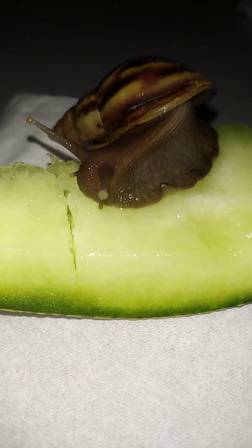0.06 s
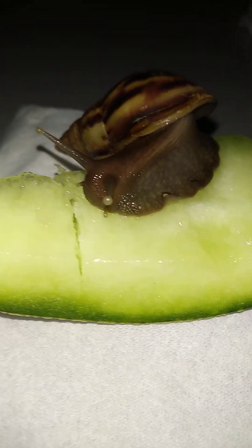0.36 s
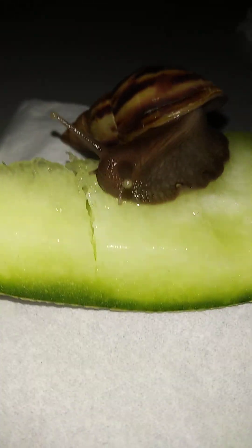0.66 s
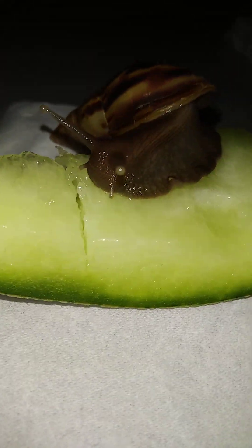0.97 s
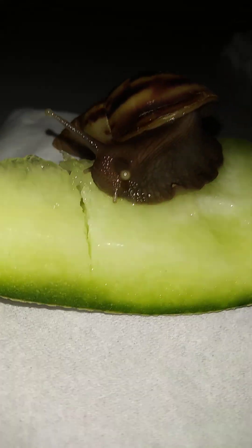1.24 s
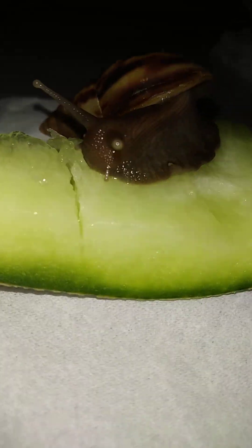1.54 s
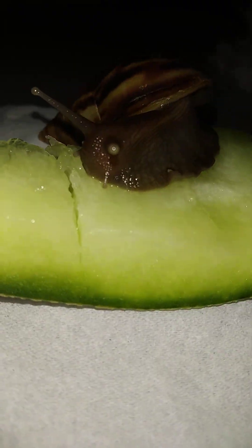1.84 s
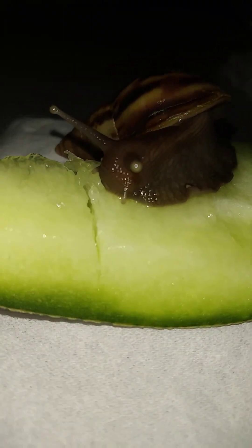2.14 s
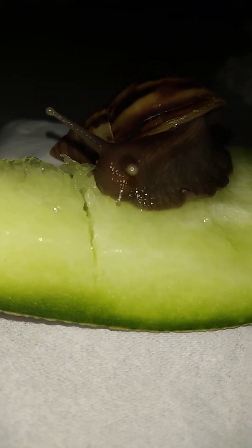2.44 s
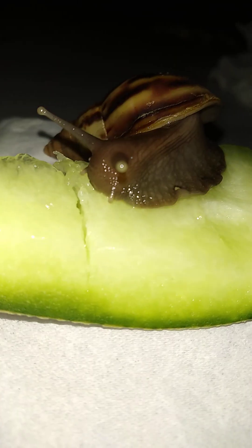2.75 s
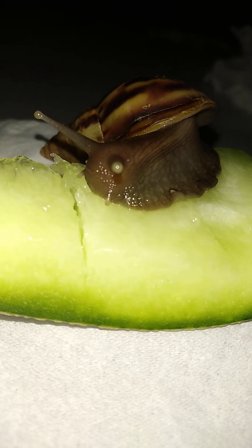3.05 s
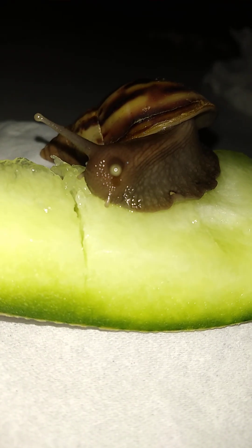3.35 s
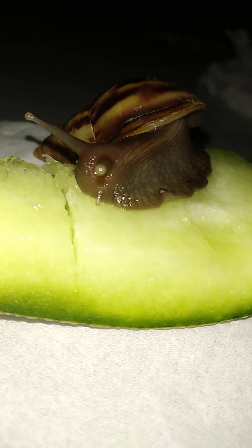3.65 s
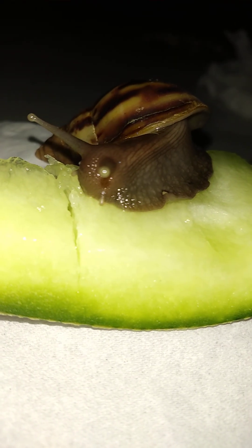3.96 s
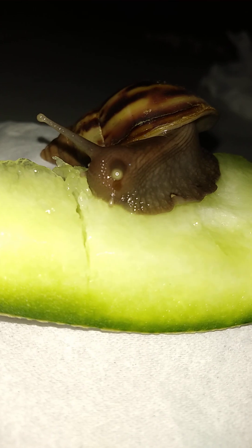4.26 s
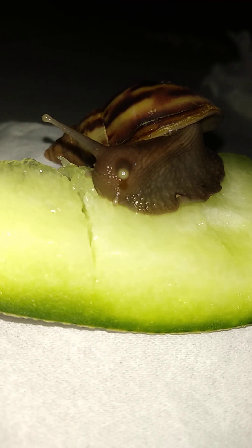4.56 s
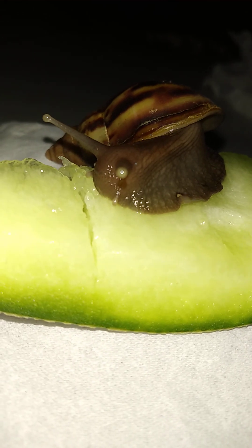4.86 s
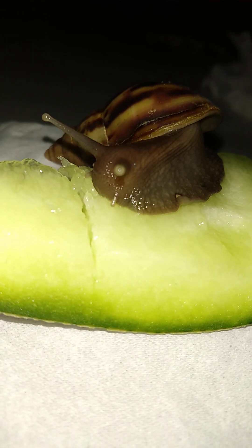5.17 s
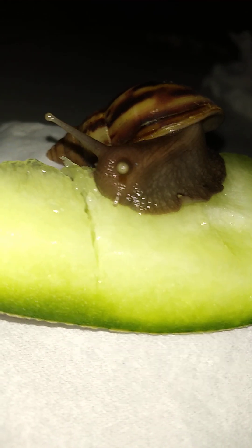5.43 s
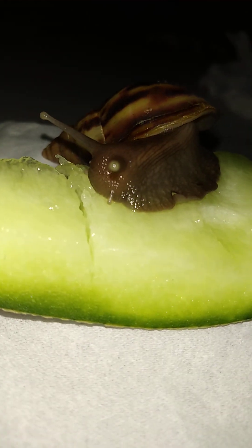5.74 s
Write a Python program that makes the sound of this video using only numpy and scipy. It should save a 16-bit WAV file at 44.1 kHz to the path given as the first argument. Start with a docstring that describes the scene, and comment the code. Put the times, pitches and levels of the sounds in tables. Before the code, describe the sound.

In a quiet room, fingers shift on a hand-held camera close to the left microphone, making soft rubs, creaks and low bumps. About a second in, a fingertip knocks and scrapes across the microphone with one sharp double click. A few light ticks and faint rustles follow. After that, only a steady soft hiss, a low room drone and a faint appliance hum remain.

```python
"""Soft rubs, creaks and bumps, one sharp double click, then only a quiet room with a faint hum.
Fingers shift on a hand-held camera's case beside the left microphone: skin sticks and slips,
the case cracks, and a fingertip knocks and scrapes as it slides off the port (the double click).
Behind them: air and microphone hiss, a low room drone and an appliance's motor tones."""
import sys
import numpy as np
from scipy import signal
from scipy.fft import rfft, irfft
from scipy.io import wavfile

SR = 44100
rng = np.random.default_rng(int(sys.argv[2]) if len(sys.argv) > 2 else 0)


def wav_out(sig):
    """Save sig, one row per channel (or a flat mono array), as 16-bit PCM at SR to the path in sys.argv[1]."""
    wavfile.write(sys.argv[1], SR, np.round(np.clip(np.atleast_2d(sig).T, -1, 1) * 32767).astype(np.int16))


N = 264600
TIME, FREQ = np.arange(N) / SR, np.fft.rfftfreq(N, 1 / SR)
EDGE_HZ = 14300


def knocks():
    """Fingertip on the port: each knock is one pressure pulse that builds and lets go."""
    # t/s, peak before roll-off/dB, build-up/s, release/s, push +1 or pull -1
    pulses = [(0.68, -33, 0.0016, .0017, -1), (0.7176, -26.5, 0.00083, 0.00082, 1),
              (.7385, -30.5, 0.0017, 0.00072, -1), (0.8345, -30, 0.0011, 0.00092, -1),
              (0.9177, -36, 0.0011, 0.0014, -1), (1.02687, -.3, .00058, .00031, -1),
              (1.0342, -10, .0014, .00013, -1), (1.03623, -11, .00024, .00033, 1),
              (1.056, -35, 0.00038, .0005, -1)]
    pressure = np.zeros(N)
    for at_s, db, build_s, release_s, direction in pulses:
        near = slice(round((at_s - .02) * SR), round((at_s + .02) * SR))
        t = TIME[near] - at_s
        width_s = np.where(t < 0, build_s, release_s)
        pressure[near] += direction * gain_of(db) * np.exp(-.5 * (t / width_s) ** 2)
    return port_rolloff(pressure)


def cracks():
    """Each dry crack rings the stiff case for a few milliseconds."""
    # t/s, peak/dB
    hits = [(0.7344, -45), (.8000, -40), (0.8097, -40), (.8190, -47), (0.9976, -37.5), (1.0017, -45),
            (1.0271, -19), (1.0352, -18), (1.086, -39)]
    # case modes: f/Hz, relative level/dB, t60/s
    modes = [(940, 5, 0.0049), (1870, 6, 0.0026), (3000, -0.5, 0.0022), (4110, -8, 0.0048),
             (7400, -24, 0.0018), (13000, -2, .001)]
    t = np.arange(SR // 50) / SR
    ring = sum(gain_of(db - 60 * t / t60_s) * np.sin(2 * np.pi * hz * t) for hz, db, t60_s in modes)
    blows = np.zeros(N)
    for at_s, db in hits:
        blows[round(at_s * SR)] = gain_of(db)
    return signal.oaconvolve(blows, ring / abs(ring).max())[:N]


def scrapes():
    """The fingertip scrapes across the port."""
    # t/s, level/dB, decay/s, tilt/(dB/oct)
    strokes = [(1.0228, -38.5, 0.0072, -2.5), (1.0272, -20.5, 0.0036, -2), (1.034, -22, 0.0036, -1.5),
               (1.051, -47, .009, -0.5), (1.0875, -45, .004, -4)]
    # spectrum: f/Hz, relative level/dB
    colour = [(150, -4.5), (380, 8.5), (720, 3), (1000, 3.5), (1400, -4), (2000, -1), (3300, -2.5),
              (4600, -4), (5200, -10), (7500, -16), (10000, -18), (13500, -14.5)]
    return friction(strokes, colour, grain_db=2, grains_per_s=14000, rise_ratio=.35)


def creaks():
    """Skin sticks and slips on the case."""
    # t/s, level/dB, decay/s, tilt/(dB/oct)
    strokes = [(.677, -51, 0.0045, 0), (.7355, -45, 0.0037, -1), (.7598, -54.5, 0.0055, -1),
               (.8015, -51, 0.0041, -1)]
    # spectrum: f/Hz, relative level/dB
    colour = [(200, -13), (600, 1), (1200, 3.5), (2300, 4.5), (4400, -4), (5300, -11.5), (8000, -17.5),
              (10500, -18), (13500, -13)]
    return friction(strokes, colour, grain_db=2.5, grains_per_s=9100, rise_ratio=.37)


def judder(first_hz=63, last_hz=50, uneven=.132, pulse_s=.0016):
    """Skin catches and lets go in soft, uneven pulses that slow as the finger drags."""
    # grip strength: t/s, level/dB
    grip_curve = [(0.66, -60), (0.67, -58), (0.724, -46), (0.782, -42.5), (0.84, -45), (0.866, -60),
                  (0.916, -44.5), (0.992, -49.5), (1.0, -48)]
    at_s, db = np.transpose(grip_curve)
    grip = gain_of(np.interp(TIME, at_s, db, left=-np.inf, right=-np.inf))
    rate_hz = np.interp(TIME, [at_s[0], at_s[-1]], [first_hz, last_hz])
    cycles = np.cumsum(rate_hz * np.exp(uneven * drift(first_hz))) / SR
    catches = np.diff(np.floor(cycles), prepend=0)
    pulses = irfft(rfft(catches) * np.exp(-2 * (np.pi * FREQ * pulse_s) ** 2), N)
    return grip * unit_rms(port_rolloff(-pulses))


def rubs():
    """Soft rubs and faint rustles."""
    # t/s, level/dB, decay/s, tilt/(dB/oct)
    strokes = [(.315, -58, 0.058, -5.5), (.56, -65, 0.069, 3), (.617, -53.5, 0.037, -2),
               (.79, -64.5, .06, .5), (1.101, -52, 0.016, -3.5), (3.30, -64.5, .04, 0),
               (3.56, -66.5, 0.055, -1), (5.1, -71, .3, .5)]
    # spectrum: f/Hz, relative level/dB
    colour = [(80, -22), (280, 3), (500, -2), (1000, -2.5), (1800, -8), (4600, -15), (5200, -21),
              (7000, -25), (10000, -32), (13500, -25)]
    return friction(strokes, colour, grain_db=5.5, grains_per_s=7000, rise_ratio=.63)


def ticks():
    """Light, bright brushes and ticks on the case's shell."""
    # t/s, level/dB, decay/s, tilt/(dB/oct)
    strokes = [(.34, -67, .027, -6), (.52, -70.5, .05, -6), (1.104, -58.5, 0.026, -5.5),
               (1.1365, -66, .002, 6), (1.2203, -56, 0.0011, -2.5), (1.3922, -59, 0.0018, 5),
               (1.675, -77, .022, 3), (2.065, -74.5, .03, 4)]
    # shell spectrum: f/Hz, relative level/dB
    colour = [(1500, -28), (4000, -7.5), (5500, -11.5), (7300, -0.5), (8500, -7), (10000, -10.5),
              (13500, -8.5)]
    return friction(strokes, colour, grain_db=-1.5, grains_per_s=20000, rise_ratio=.79)


def drone(level_db=-64.5, swell_db=.2):
    """Low, slightly swelling noise of the room."""
    # spectrum: f/Hz, relative level/dB
    colour = [(25, -33), (55, -14.5), (80, -8), (98, 3), (125, -6.5), (165, 0.5), (215, -5), (295, -3),
              (370, -8), (470, -12), (620, -24), (2000, -39), (8000, -71.5)]
    return gain_of(level_db + swell_db * drift(3.5)) * coloured(rng.standard_normal(N), colour)


def hum():
    """Appliance motor tones, each wandering in strength and phase."""
    # f/Hz, rms level/dB, unsteadiness 0-1
    tones = [(99.6, -77, .5), (164, -80.5, .7), (238, -74, .25), (298.6, -72, 0.38), (402, -76, .15),
             (480, -82.5, 0.4), (985, -89.5, .2), (1494, -97.5, .1), (1560, -95, .2)]
    out = np.zeros(N)
    for hz, db, unsteady in tones:
        waver = 1 + unsteady * (drift(3) + 1j * drift(3))
        out += gain_of(db) * unit_rms((waver * np.exp(2j * np.pi * hz * TIME)).real)
    return out


def hiss(level_db=-68.5, flutter_db=.38):
    """Air and microphone hiss, separate noise on each side."""
    # spectrum: f/Hz, relative level/dB
    colour = [(40, -30), (100, -12.5), (330, -12.5), (520, 2), (1100, -4.5), (2400, -8), (4650, -11.5),
              (4900, -18), (6300, -17), (7600, -14.2), (9200, -19), (11200, -21), (13000, -19)]
    level = gain_of(level_db + flutter_db * drift(6))
    return level * np.array([coloured(rng.standard_normal(N), colour) for side in range(2)])


def friction(strokes, colour, grain_db, grains_per_s, rise_ratio):
    """Tiny uneven slips make a grainy noise; each stroke swells to its peak, then dies away."""
    sizes = gain_of(grain_db * np.minimum(rng.exponential(1, N), 4))
    slips = sizes * rng.choice([-1, 1], N) * (rng.random(N) < grains_per_s / SR)
    out = np.zeros(N)
    for peak_s, db, decay_s, tilt_db_oct in strokes:
        age = (TIME - peak_s) / decay_s
        falloff = np.where(age < 0, .5 * (age / rise_ratio) ** 2, age)
        force = np.exp(-np.minimum(falloff, 20))
        out += gain_of(db) * force * coloured(slips, colour, tilt_db_oct)
    return out


def port_rolloff(pressure, port_hz=89, q=1.4, cut_hz=75, cut_depth=.74):
    """The microphone port's bass roll-off makes every push swing back."""
    w = 1j * FREQ / port_hz
    highpass = w ** 2 / (w ** 2 + w / q + 1)
    low_cut = 1 - cut_depth * np.exp(-(FREQ / cut_hz) ** 6)
    return irfft(rfft(pressure) * highpass * low_cut, N)


def coloured(x, colour, tilt_db_oct=0):
    """Shapes x by a tilted spectrum; rms 1."""
    hz, db = np.transpose(colour)
    octave = np.log2(np.clip(FREQ, hz.min(), EDGE_HZ))
    shape = gain_of(np.interp(octave, np.log2(hz), db) + tilt_db_oct * octave)
    return unit_rms(irfft(rfft(x) * shape * (FREQ < EDGE_HZ), N))


def drift(hz):
    """Random wander up to about hz; rms 1."""
    return unit_rms(irfft(rfft(rng.standard_normal(N)) * np.exp(-(FREQ / hz) ** 2), N))


def gain_of(db):
    return 10 ** (np.asarray(db) / 20)


def unit_rms(x):
    return x / np.sqrt(np.mean(x ** 2) + 1e-20)


def on_left(x, right_db):
    """Full level on the left, less on the right."""
    return np.array([x, gain_of(right_db) * x])


def scene():
    """The hand beside the left microphone and faint rustles, over the room."""
    port_friction = creaks() + scrapes()
    rustles = on_left(rubs(), right_db=-33.5) + on_left(ticks(), right_db=-27)
    room = hiss() + on_left(drone() + hum(), right_db=-15)
    at_port = knocks() + cracks() + judder() + port_friction
    return on_left(at_port, right_db=-65.5) + rustles + room


def record(dry):
    """Steep low-pass at EDGE_HZ."""
    lowpass = signal.firwin(801, EDGE_HZ, window=("kaiser", 8), fs=SR)
    return signal.oaconvolve(dry, lowpass[None], "same")


dry = scene()
out = record(dry)
wav_out(out)
```